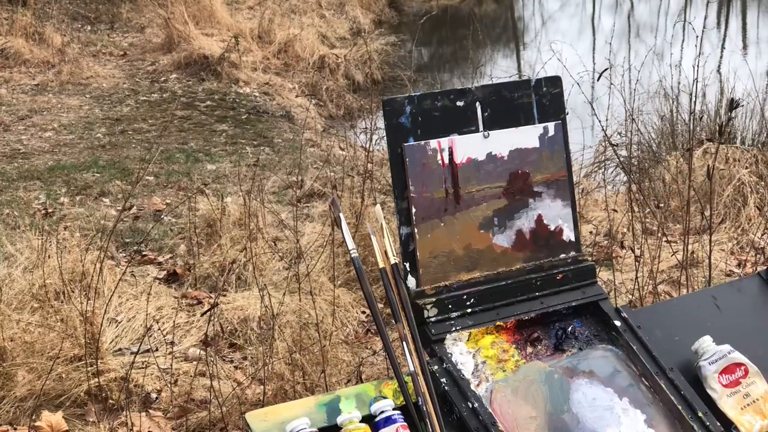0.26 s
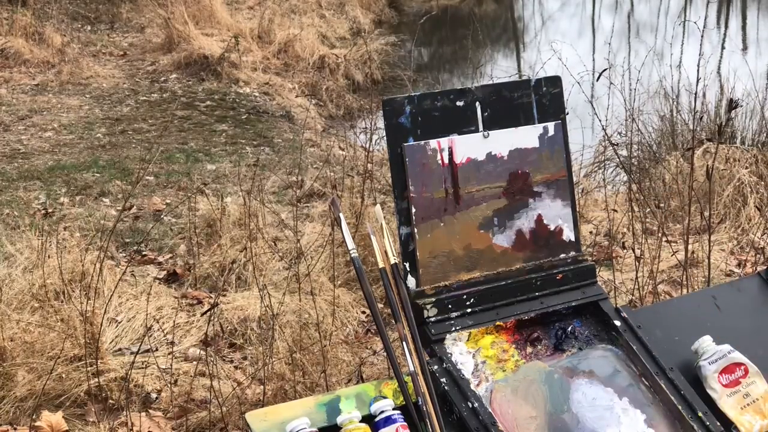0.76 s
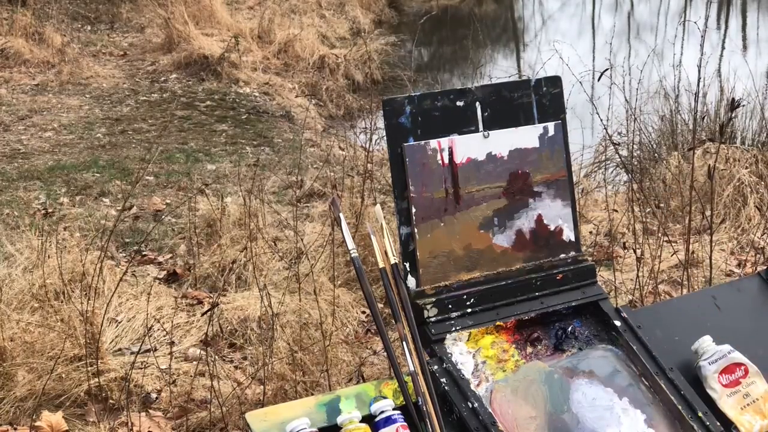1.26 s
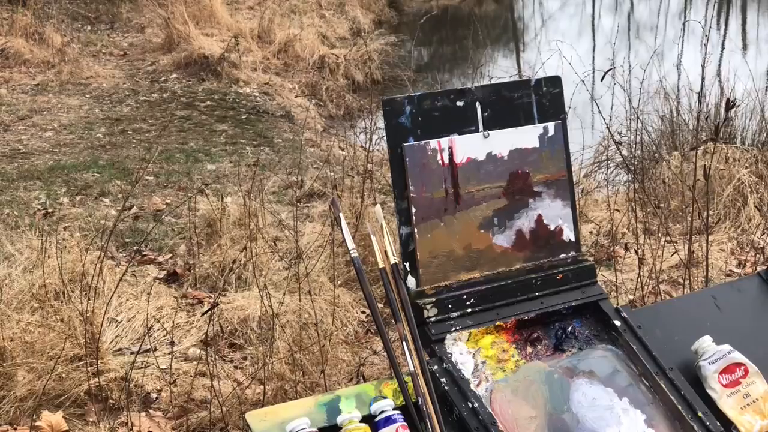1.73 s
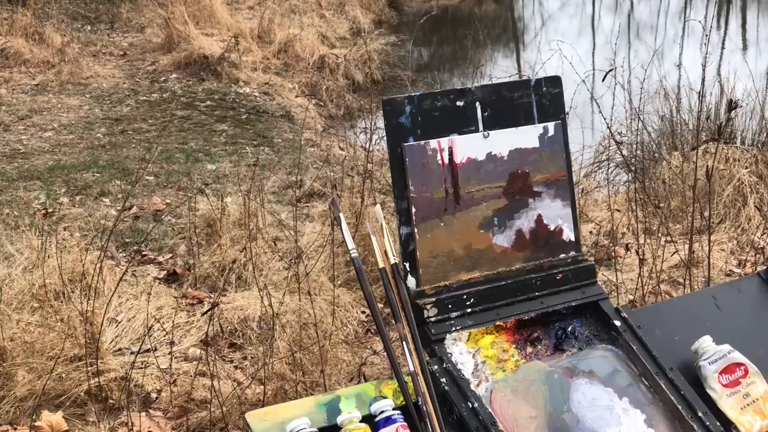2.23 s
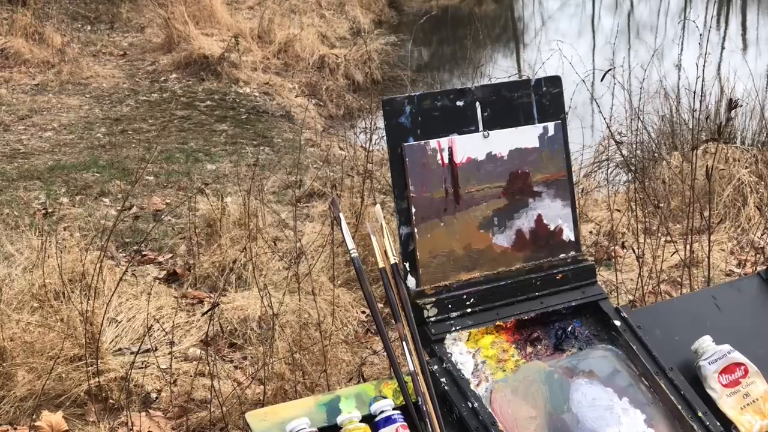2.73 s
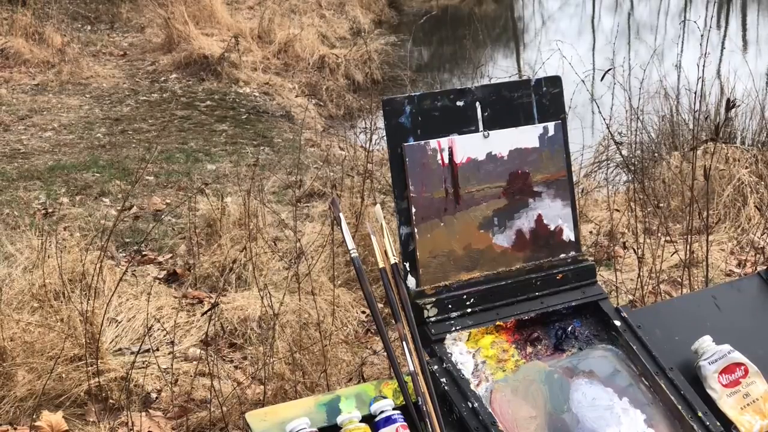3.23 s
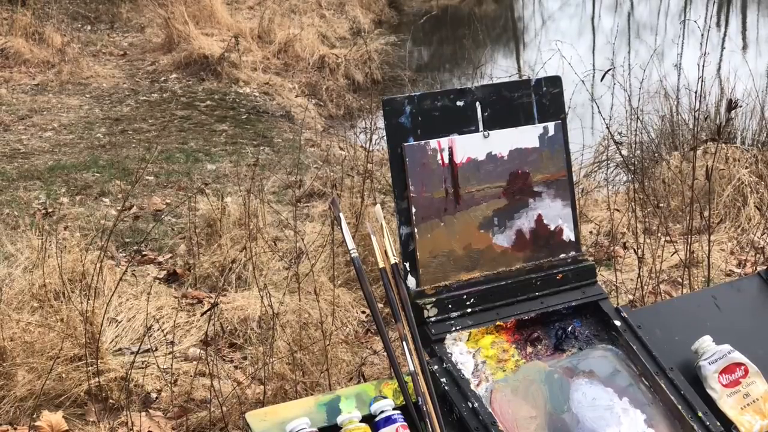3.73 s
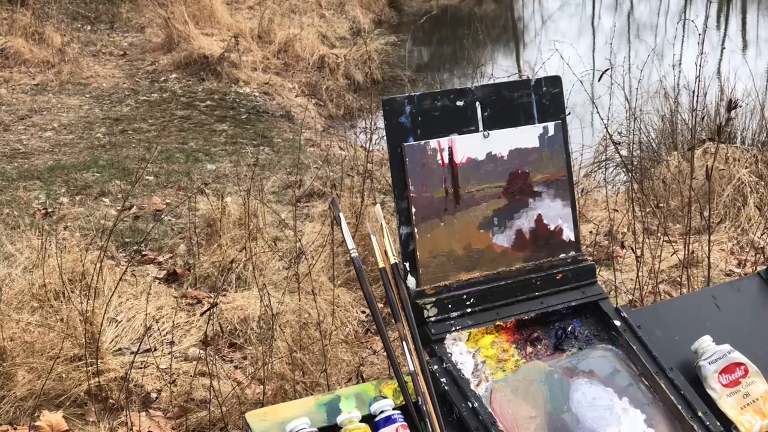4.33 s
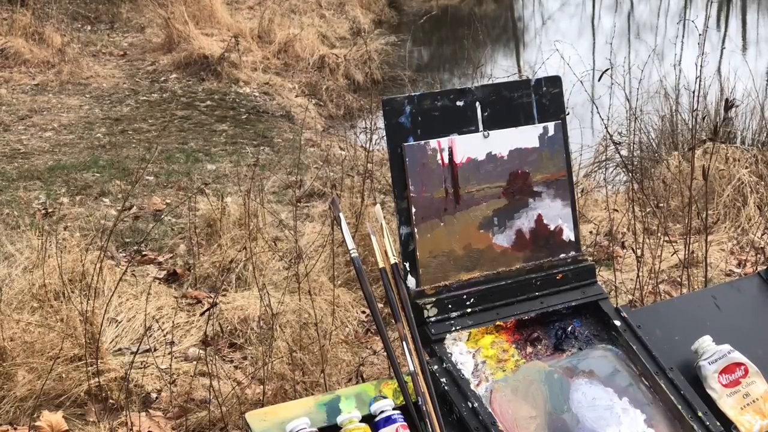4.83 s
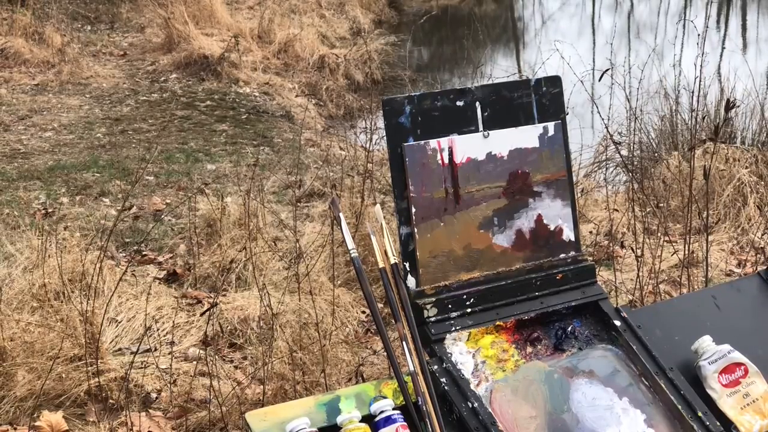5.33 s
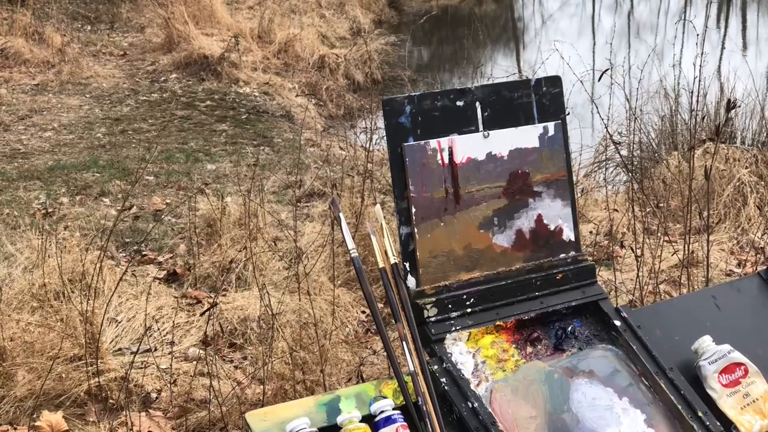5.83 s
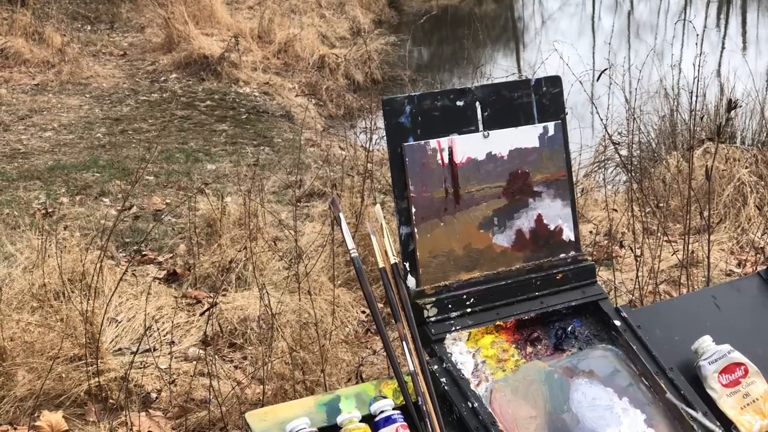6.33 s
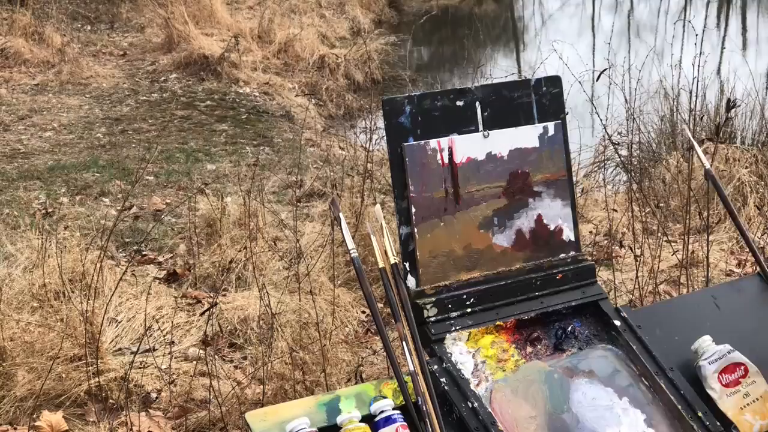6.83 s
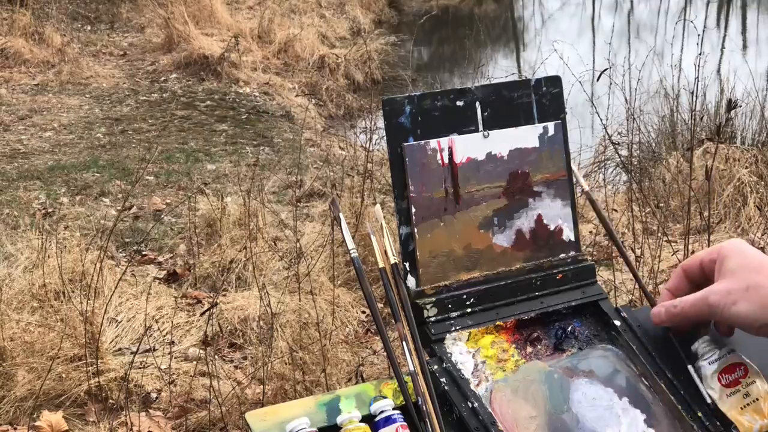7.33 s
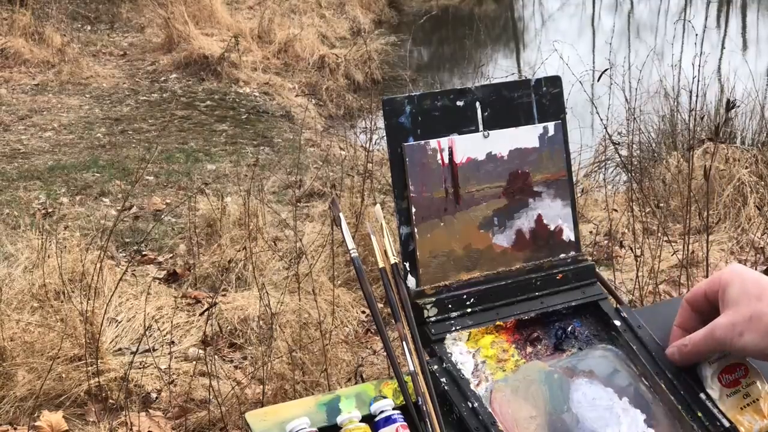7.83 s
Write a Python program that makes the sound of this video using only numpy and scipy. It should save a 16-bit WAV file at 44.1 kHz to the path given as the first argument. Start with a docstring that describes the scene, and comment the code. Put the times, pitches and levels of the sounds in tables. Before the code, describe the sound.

Outdoors, light wet ticks of a brush in a jar, soft cloth rubbing and sharp wooden taps over a far engine's low throb and road wash.

```python
"""Brush and jar beside a pond

Far off a heavy engine throbs at idle, revs up under load and eases back, as harmonics of its cycle plus exhaust noise.
Shaped noise makes the tyre wash, the far rumble and the microphone hiss; slow swings and a low flutter make the wind.
Close by a brush swirls in a jar (short rings and ticks), is wiped on a rag (swelling hiss)
and is laid on a wooden box (decaying modes with a dry snap).
"""
import sys
import numpy as np
from scipy import signal
from scipy.io import wavfile
from scipy.ndimage import uniform_filter1d

SR = 44100
rng = np.random.default_rng(int(sys.argv[2]) if len(sys.argv) > 2 else 0)


def inscribe(sig):
    """Save sig as 16-bit PCM at rate SR to the path in sys.argv[1].

    A 1-D sig is mono; a 2-D sig holds one channel per row.
    Samples are clipped to [-1, 1] before scaling.
    """
    pcm = np.round(np.clip(np.atleast_2d(sig).T, -1, 1) * 32767)
    wavfile.write(sys.argv[1], SR, pcm.astype(np.int16))


N = 355710  # length in samples

# The engine's path. Each row: time in seconds, level in dB, load from 0 to 1.
ENGINE_PATH = [(0, -42, 0.46), (1, -45.5, 0.45), (2, -47.5, 0.14), (3, -47.5, 0.5), (4, -43.5, 0.5),
               (4.5, -42.5, 0.84), (5.3, -40, 0.95), (6, -38, 0.81), (6.6, -38, 1), (7.6, -41, 0.91),
               (8.07, -43.5, 0.73)]
# Harmonics of the engine cycle. Each row: order, relative level in dB when idling, the same under full load.
ENGINE_ORDERS = [(3, -33, -40), (4, -11, -15), (5, -7, -2.5), (6, 5.5, -20.5), (7, -7.5, -13),
                 (8, -0.3, 0.1), (9, -10.5, -15.5), (10, -12.5, -16), (11, -4, -40), (12, -19.5, -18.5),
                 (13, -26, -12.5), (14, -25.5, -19), (15, -17, -23.5), (16, -32, -14.5), (17, -36, -19),
                 (18, -22, -25.5), (19, -27, -32), (20, -39, -33)]
# Colour of the exhaust noise. Each row: frequency in Hz, relative level in dB per Hz.
RASP_COLOUR = [(100, -21), (170, 2.5), (230, -2), (330, -6.5), (450, -9), (800, -68)]
# Colour of the tyre wash. Each row: frequency in Hz, relative level in dB per Hz.
TYRE_COLOUR = [(180, -35), (300, -6), (450, -5.5), (512, -4.5), (710, -0.5), (1060, -2.5), (1220, -5),
               (1330, -4.5), (2090, -15), (2330, -20), (3200, -31), (4160, -53), (7040, -120)]
# The tyre wash over time. Each row: time in seconds, level in dB.
TYRE_PATH = [(0.0, -48), (3.3, -49), (5.5, -50), (8.07, -51.5)]
# Colour of the far traffic. Each row: frequency in Hz, relative level in dB per Hz.
RUMBLE_COLOUR = [(20, -18), (38, -14), (60, 1), (120, -1), (200, -11), (320, -15), (500, -46)]
# Wind on the microphone. Each row: time in seconds, slow push in dB, flutter in dB.
WIND_PATH = [(0.0, -50, -56), (0.09, -40, -58), (0.36, -27, -51), (0.76, -31.5, -60), (0.85, -20, -59),
             (0.92, -21.5, -47), (2.0, -22, -52), (2.09, -34, -44), (2.29, -18, -69), (2.38, -20, -57),
             (2.45, -21.5, -33), (2.65, -25, -46), (3.06, -26, -47), (3.17, -32, -58), (3.39, -27.5, -68),
             (3.62, -39, -57), (3.88, -33.5, -65), (4.6, -20.5, -33), (4.96, -29.5, -54),
             (5.12, -24.5, -34), (5.5, -20, -42), (5.57, -21.5, -43), (5.98, -29.5, -43),
             (6.18, -21.5, -44), (6.38, -27.5, -45), (8.07, -35.5, -51)]
# Colour of the rubbed cloth. Each row: frequency in Hz, relative level in dB per Hz.
RAG_COLOUR = [(1200, 2), (2000, 1), (2700, 0.5), (3800, -1.5), (5300, 1.5), (6500, -0.5), (8700, 0.5),
              (9800, -8), (11500, -12), (13800, -9), (15800, -30)]
# Strokes on the rag. Each row: time of the peak in seconds, level in dB, rise in seconds, fall in seconds,
# extra sheen above 9 kHz in dB, extra lift near 4 kHz in dB.
WIPE_STROKES = [(0.02, -68, 0.046, .3, 12, -17), (3.12, -60.5, 0.42, 0.63, 6, 3.5),
                (3.29, -60, 0.12, 0.08, -10, 4), (3.69, -64.5, 0.048, 0.067, 7, .1),
                (3.81, -57, .09, 0.087, 2, -3), (3.99, -69.5, .15, 0.23, 9, 6),
                (4.27, -60, 0.1, 0.15, 4.5, -1), (4.36, -65, 0.12, 0.034, -2, 0),
                (4.45, -65.5, 0.035, 0.17, 13, -8), (4.64, -63.5, 0.53, 0.12, 7, 4),
                (4.78, -67.5, 0.11, 0.1, 0, 10), (4.89, -68.5, 0.11, 0.31, 2, 8),
                (5.278, -73, 0.026, 0.043, 21.5, -2), (5.5, -71, .6, 0.038, -4, 5),
                (5.63, -70, 0.1, .3, 9, 3), (5.79, -63, 0.65, 0.063, 3, 5), (5.9, -66.5, .09, .6, 0, -4),
                (6.12, -67.5, .4, 0.18, 4, 5), (6.436, -54.5, 0.097, .1, -4, 12),
                (7.364, -63, 0.011, 0.056, 4, 6), (7.44, -65.5, 0.12, .2, -6, 9),
                (7.51, -66, .08, 0.17, -7, 7)]
# Rings in the jar; a big splash sets off several. Each row: start in seconds, peak in dB, ring in Hz.
JAR_RINGS = [(0.6164, -50.5, 6400), (0.6164, -52, 10600), (0.632, -41.5, 2190), (0.633, -36, 1220),
             (0.8614, -49, 2300), (0.87, -40.5, 2900), (0.8849, -53, 4640), (0.884, -40.5, 3160),
             (0.8975, -44, 4600), (0.8974, -35, 5670), (0.8982, -46, 10600), (1.008, -50, 4720),
             (1.024, -35.5, 2390), (1.053, -37.5, 3000), (1.054, -49, 4870), (1.054, -28.5, 1370),
             (1.0654, -41, 10300), (1.1463, -45, 3300), (1.147, -50, 4540), (1.1714, -44.5, 5250),
             (1.1714, -51, 10600), (1.219, -34.5, 3840), (1.22, -38, 5800), (1.219, -45, 10600),
             (1.226, -31, 3480), (1.227, -37, 5970), (1.3086, -45.5, 2400), (1.3785, -41, 3140),
             (1.3786, -44, 5400), (1.6038, -42.5, 3330), (1.6034, -51, 5470), (1.627, -37.5, 1320),
             (1.647, -53, 2840), (1.647, -47, 6600), (1.646, -48, 10600), (1.6501, -26, 2780),
             (1.65, -40, 1420), (1.731, -40, 5250), (1.732, -46, 8700), (1.732, -45, 10600),
             (1.7575, -37, 2800), (1.7594, -42.5, 5260), (1.7594, -53, 10600), (1.759, -39, 1520),
             (1.8243, -45, 5960), (1.8234, -51, 2660), (1.8674, -41.5, 5900), (1.978, -51, 3200),
             (1.9784, -44, 8300), (1.978, -45, 10600), (2.0414, -54, 5570), (2.063, -45.5, 3040),
             (2.126, -50, 2570), (2.157, -47, 5540), (2.204, -38.5, 6260), (2.2217, -36, 3030),
             (2.2233, -47, 5470), (2.287, -43, 4680), (2.287, -48, 10600), (2.293, -52, 12500),
             (2.353, -39.5, 2190), (2.389, -40, 3220), (2.389, -50, 6000), (2.402, -40, 2820),
             (2.401, -47, 5340), (2.3985, -57, 11500), (2.399, -34, 1500), (2.4797, -42, 3360),
             (2.479, -39.5, 6030), (2.5274, -38.5, 6100), (2.564, -37.5, 3340), (2.565, -45, 4700),
             (2.5704, -29.5, 3380), (2.57, -40.5, 5650), (2.5693, -43, 10600), (2.591, -47, 2910),
             (2.603, -47, 2670), (2.603, -51, 7150), (2.7108, -34.5, 6000), (2.7204, -49, 2500),
             (2.7204, -39, 5270), (2.7195, -51, 8500), (2.729, -52, 13000)]
# How a jar ring's character follows its pitch. Each row: frequency in Hz, time to fall 60 dB in seconds,
# pitch ratio of its partner, amplitude share of the partner.
RING_CHARACTER = [(1400, 0.021, 1.04, 0.066), (3970, 0.0061, 0.85, 0.12), (4540, 0.0064, 1.45, 0.7),
                  (8700, 0.0077, 1.37, 0.29), (10000, 0.00017, 1.1, .05)]
# Contacts of the brush as it touches down and is laid down. Each row: start in seconds, level in dB, then dB
# added to the modes under 1.5 kHz, from 1.5 to 3.5 kHz, and above 6.2 kHz.
BRUSH_TAPS = [(7.3173, -53, -2, .1, 7), (7.3309, -16, -7, -6.5, 5), (7.3537, -30.5, 2, -1, -2),
              (7.3715, -42, 0, 5, -11), (7.451, -57, 4, 5, -2), (7.4629, -39, 5, 2, -4),
              (7.5162, -43, 2, 7, -2), (7.665, -41, 34, 7, -4), (7.763, -13.5, 12.5, 1, 3),
              (7.77, -32, -2, 2, 10), (7.9748, -40, 17, -1, 4)]
# Modes of brush handle and box. Each row: frequency in Hz, relative level in dB, time to fall 60 dB in seconds.
BOX_MODES = [(648, -1.5, 0.053), (820, -1.5, 0.024), (900, -1.5, 0.019), (1092, 7, 0.017),
             (1340, -18, 0.0074), (1760, 2.5, 0.038), (2040, 5, 0.02), (2180, -19, 0.0076),
             (2780, 8.5, 0.012), (3000, 10, 0.0094), (3180, -13, 0.0076), (3920, 7.5, 0.017),
             (4730, -3, 0.0091), (5400, 12, 0.0077), (5900, -2.5, 0.008), (6740, 7, 0.0059),
             (7480, 1, 0.0043), (8520, 8, 0.0066), (10760, -14, 0.005), (12440, -2, 0.0045),
             (14100, -22, .003)]
# Colour of the microphone hiss. Each row: frequency in Hz, relative level in dB per Hz.
HISS_COLOUR = [(1000, -1), (3000, 15.5), (5000, 10), (8500, 7.5), (10000, 2), (14000, -8), (16000, -25)]

IDLE_PER_S, LOADED_PER_S = 14.07, 15.49  # engine cycles a second
REV_UP_S, REV_DOWN_S, SETTLE_S = 4.06, 7.55, 0.17  # the speed settles exponentially after each change
RASP_DB = -12  # at full load, against the orders
RUMBLE_DB = -50
CRACKLE_DB = -69
STIR_TO_S, STIR_FADE_S = 2.72, 0.094  # the crackle holds until the first, then fades over the second
WIPE_EDGE_DB, WIPE_LOW_DB = -17.5, 6.5  # drop at the ends of rise and fall; tilt towards the low end
SPLASH_S = 0.0036  # the driving burst peaks at a third of this
FAINT_COUNT, FAINT_DB, FAINT_RANGE_DB = 90, -53.5, 8  # number, middle level, softest to loudest
CLUSTER_S = 0.068  # faint rings gather around the loud ones within this span
CRACK_DB, CRACK_T60 = -12, 0.012  # the dry snap of each contact: dB, s
SCATTER_DB, SCATTER_T60 = -27.5, 0.1  # the snap thrown back by dry grass: dB, s
HISS_DB = -73
EDGE_HZ = 15750  # upper edge of the finished sound


def gain_of(db):
    """Decibels to gain."""
    return 10 ** (np.asarray(db) / 20)


def evened(x):
    """Scales to rms 1."""
    return x / np.sqrt(np.mean(x ** 2) + 1e-20)


def curves(rows):
    """Each column of a table joined by straight lines over all samples."""
    s, *columns = np.transpose(rows)
    return [np.interp(np.arange(N) / SR, s, column) for column in columns]


def add(mix, s, sound):
    """Mixes a sound in at time s."""
    part = mix[round(s * SR):][:len(sound)]
    part += sound[:len(part)]


def drift(lo_hz, hi_hz):
    """Slow chance movement: sines of random phase, slower ones stronger, rms 1."""
    t = np.arange(0, N + 64, 64) / SR
    hz = np.geomspace(lo_hz, hi_hz, 30)[:, None]
    waves = np.sin(2 * np.pi * (hz * t + rng.random((30, 1)))) / np.sqrt(hz)
    return np.interp(np.arange(N) / SR, t, evened(waves.sum(0)))


def noise(points, patchy_db, size):
    """Random short-time spectra of the given colour, with drifting louder and softer patches, rms 1."""
    hz = np.fft.rfftfreq(size, 1 / SR)
    real, imaginary, patches = rng.standard_normal((N * 4 // size + 5, len(hz), 3)).T
    patches = uniform_filter1d(patches, 10, 0)  # smooth over frequency
    patches = evened(uniform_filter1d(patches, 12, 1))  # then over time
    point_hz, point_db = np.transpose(points)
    colour_db = np.interp(np.log(hz + 1), np.log(point_hz + 1), point_db)[:, None]
    spectra = (real + 1j * imaginary) * gain_of(colour_db + patchy_db * patches)
    return evened(signal.istft(spectra, nperseg=size, noverlap=size * 3 // 4)[1][:N])


def ring(hz, t60, rise_turns=0.92):
    """One mode, swelling over a turn or so and dying 60 dB in t60 seconds, at least half a millisecond."""
    t = np.arange(3000) / SR
    decay = gain_of(-60 * t / max(t60, 5e-4))
    swell = 1 - np.exp(-(t * hz / rise_turns) ** 2)
    return np.sin(2 * np.pi * hz * t) * decay * swell


def struck(body, length):
    """A body driven by a ragged burst of noise instead of one clean blow; peak 1."""
    t = np.arange(1000) / SR
    burst = rng.standard_normal(1000) * t * np.exp(-3 * t / max(length, 1e-4))
    sound = signal.fftconvolve(burst, body)
    return sound / abs(sound).max()


def engine():
    """Orders of the engine cycle, the low ones in step so that they throb once a cycle; load shifts their balance."""
    t = np.arange(N) / SR
    level_db, load = curves(ENGINE_PATH)
    up, down = (1 - np.exp(-np.maximum(t - s, 0) / SETTLE_S) for s in (REV_UP_S, REV_DOWN_S))
    # the drop gives back most of the gained speed
    speed = IDLE_PER_S + (LOADED_PER_S - IDLE_PER_S) * up * (1 - 0.827 * down)
    turns = np.cumsum(speed) / SR
    orders = np.zeros(N)
    for k, idle_db, load_db in ENGINE_ORDERS:
        # moving air on the long path makes each order waver
        waver_db = (0.81 + 0.061 * k) * drift(0.309, 2.5)
        order_db = (1 - load) * idle_db + load * load_db + waver_db
        phase = 0.11 * k * rng.standard_normal() + 0.021 * k * drift(0.275, 5.0)
        orders += gain_of(order_db) * np.cos(2 * np.pi * round(k) * turns + phase)
    rasp = gain_of(RASP_DB) * load ** 2 * noise(RASP_COLOUR, patchy_db=-1.0, size=4096)
    return gain_of(level_db) * (np.sqrt(2) * orders + rasp)


def road():
    """Tyre wash around 1 kHz and a dull rumble of far traffic, both coloured noise."""
    tyres_db, = curves(TYRE_PATH)
    wash_gain = gain_of(tyres_db + 0.5 * drift(0.493, 12.0))
    wash = wash_gain * noise(TYRE_COLOUR, patchy_db=0.7, size=1024)
    return wash + gain_of(RUMBLE_DB) * noise(RUMBLE_COLOUR, patchy_db=2.2, size=4096)


def wind():
    """Pressure swings below hearing, with a lumpy flutter above them."""
    push_db, flutter_db = curves(WIND_PATH)
    flutter_band = signal.butter(2, [11.0, 26.0], "band", fs=SR, output="sos")
    flutter = evened(signal.sosfilt(flutter_band, rng.standard_normal(N)))
    push = gain_of(push_db) * drift(1.5, 24.0)
    slow = signal.butter(3, 15.0, fs=SR, output="sos")
    return signal.sosfiltfilt(slow, push) + gain_of(flutter_db) * flutter


def crackle():
    """Wet bristles and water: many tiny ticks at random, the lower-pitched ones stronger."""
    happens = rng.random(N) < 1500 / SR  # about 1500 ticks a second
    size = gain_of(np.minimum(rng.exponential(1, N), 5)) * happens
    kind = rng.integers(0, 16, N)
    ticks = np.zeros(N)
    for k, hz in enumerate(np.geomspace(2600.0, 11000.0, 16)):
        tick = struck(ring(hz, 0.0006), 0.0014)
        ticks += signal.oaconvolve(size * (kind == k), tick)[:N] * (hz / 3000) ** -0.4
    stirring = np.clip((STIR_TO_S + STIR_FADE_S - np.arange(N) / SR) / STIR_FADE_S, 0, 1)
    return gain_of(CRACKLE_DB) * stirring * evened(ticks)


def rag():
    """Cloth and dry grass rubbing: fine hiss that flickers with small slips; each wipe swells and fades."""
    t = np.arange(N) / SR
    slips = evened(uniform_filter1d(rng.standard_normal(N), 200))
    hiss = gain_of(0.83 * slips) * noise(RAG_COLOUR, patchy_db=2.0, size=512)
    low, sheen, band = [signal.sosfiltfilt(signal.butter(2, hz, kind, fs=SR, output="sos"), hiss)
                        for hz, kind in [(4800.0, "low"), (9400.0, "high"), ([3550.0, 4250.0], "band")]]
    power = np.zeros((3, N))  # of the whole hiss, its sheen and its band
    for s, db, rise, fall, sheen_db, lift_db in WIPE_STROKES:
        stroke_db = db + WIPE_EDGE_DB * np.maximum((s - t) / rise, (t - s) / fall)
        power += gain_of(stroke_db + np.array([[0], [sheen_db], [lift_db]])) ** 2
    whole, bright, lifted = np.sqrt(power)
    tilted = hiss + (gain_of(WIPE_LOW_DB) - 1) * low
    return whole * tilted + (bright - whole) * sheen + (lifted - whole) * band


def swirl():
    """Each knock and splash in the jar is a short ring, a rough pair; faint ones come at random."""
    which, when, size, pitch = rng.random((FAINT_COUNT, 4)).T
    near = np.array(JAR_RINGS)[(which * len(JAR_RINGS)).astype(int), 0] + CLUSTER_S * (when - 0.3)
    faint_db = FAINT_DB + FAINT_RANGE_DB * (size - 0.5)
    faint = zip(near, faint_db, 2590.0 * 3.8 ** pitch)
    at_hz, *laws = np.transpose(RING_CHARACTER)
    out = np.zeros(N)
    for s, db, hz in [*JAR_RINGS, *faint]:
        t60, ratio, share = (np.interp(hz, at_hz, law) for law in laws)
        main = ring(hz, t60, np.clip(t60 / 0.006, 0.18, 1))
        partner = share * ring(ratio * hz, 0.51 * t60)
        add(out, s, gain_of(db) * struck(main + partner, SPLASH_S))
    return out


def taps():
    """The brush touches down and is laid on the box, bouncing; each contact sets the share of each range of
    modes."""
    out, t = np.zeros(N), np.arange(3000) / SR
    snap = gain_of(CRACK_DB - 60 * t / CRACK_T60) + gain_of(SCATTER_DB - 60 * t / SCATTER_T60)
    crisp = signal.butter(2, [1300.0, 9500.0], "band", fs=SR, output="sos")
    for s, db, low_db, mid_db, top_db in BRUSH_TAPS:
        shares_db = [low_db, mid_db, 0, top_db]
        body = np.zeros(3000)
        for k, (hz, mode_db, t60) in enumerate(BOX_MODES):
            share_db = shares_db[np.searchsorted([1500, 3500, 6200], hz)]
            # neighbouring modes swing against each other
            body += (-1) ** k * gain_of(mode_db + share_db) * ring(hz, t60, 0.61)
        body = body / abs(body).max()
        add(out, s, gain_of(db) * body)  # the clean first contact
        add(out, s, gain_of(db - 7) * struck(body, 0.0018))  # its rattle
        add(out, s, snap * gain_of(db) * signal.sosfilt(crisp, rng.standard_normal(3000)))
    return out


def nearby(x, wet_db):
    """Scatter from easel, lid and ground as a short noise tail; sound and tail both lose their bass."""
    t = np.arange(4000) / SR
    tail = rng.standard_normal(4000) * gain_of(-60 * t / 0.059) * (t > 0.0015)
    wet = x + gain_of(wet_db) * signal.oaconvolve(x, tail / np.linalg.norm(tail))[:N]
    return signal.sosfilt(signal.butter(4, 550.0, "high", fs=SR, output="sos"), wet)


def scene():
    """All sources at one microphone."""
    distant = engine() + road() + wind()
    jar = nearby(crackle() + swirl(), wet_db=-17)
    box = nearby(taps(), wet_db=-16.5)
    return (distant + rag() + jar + box)[None]


def record(dry):
    """Microphone hiss, then the band limit."""
    hissing = dry + gain_of(HISS_DB) * noise(HISS_COLOUR, patchy_db=-4.0, size=512)
    band_limit = signal.firwin(1023, EDGE_HZ, window=("kaiser", 9), fs=SR)
    return signal.oaconvolve(hissing, band_limit[None], "same")


dry = scene()
out = record(dry)
inscribe(out)
```